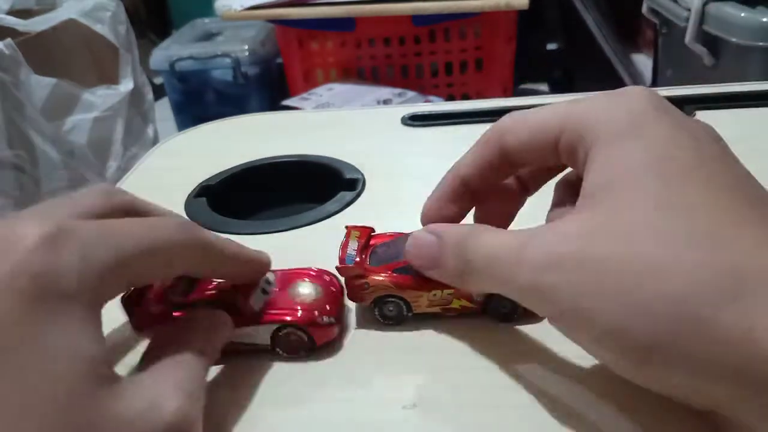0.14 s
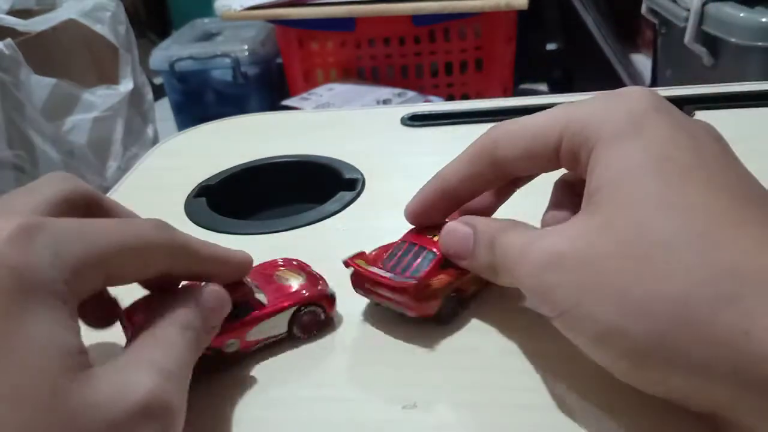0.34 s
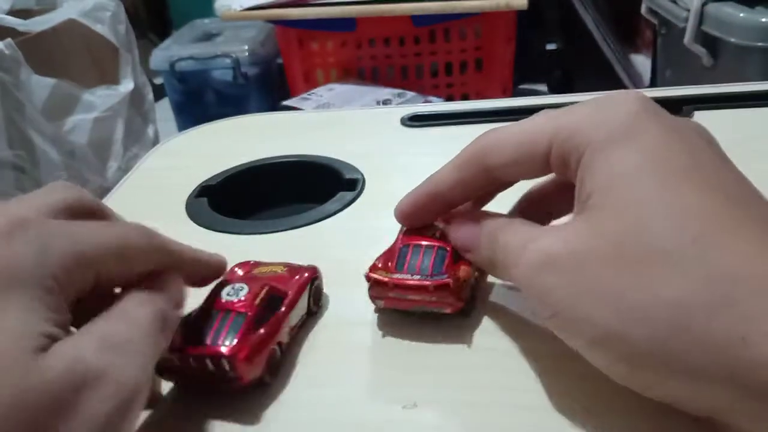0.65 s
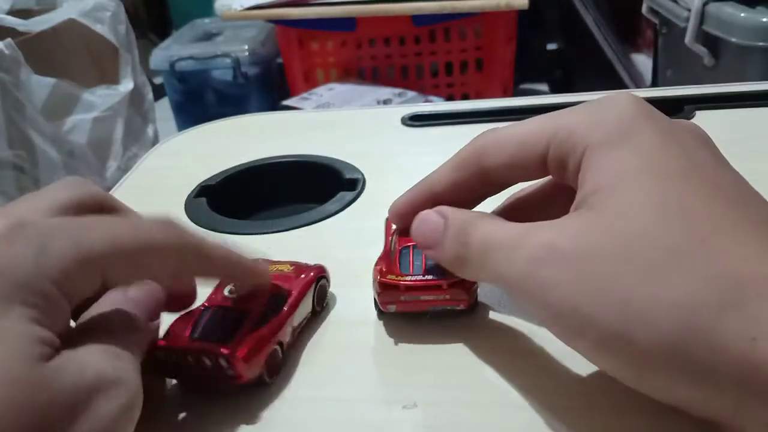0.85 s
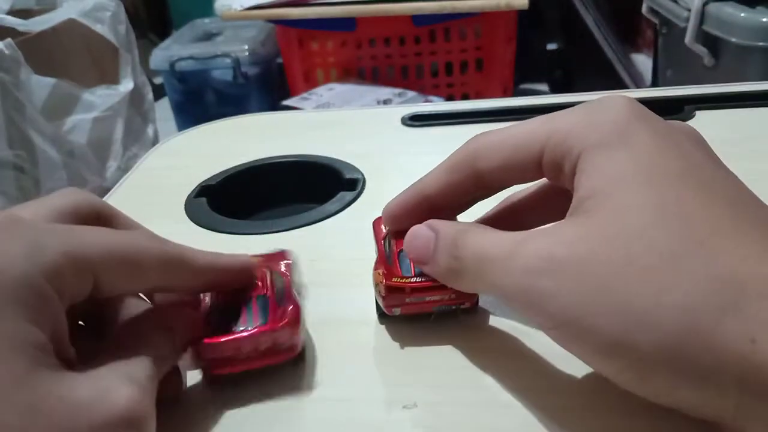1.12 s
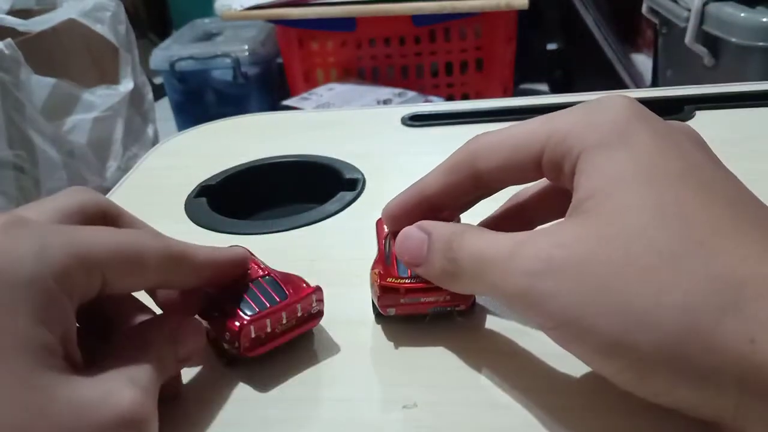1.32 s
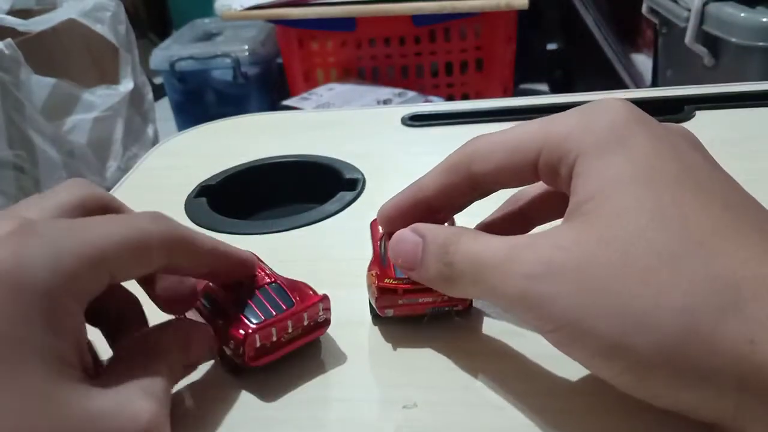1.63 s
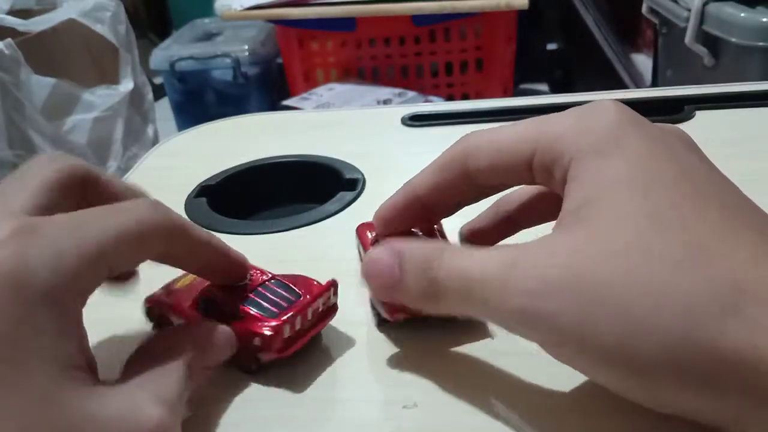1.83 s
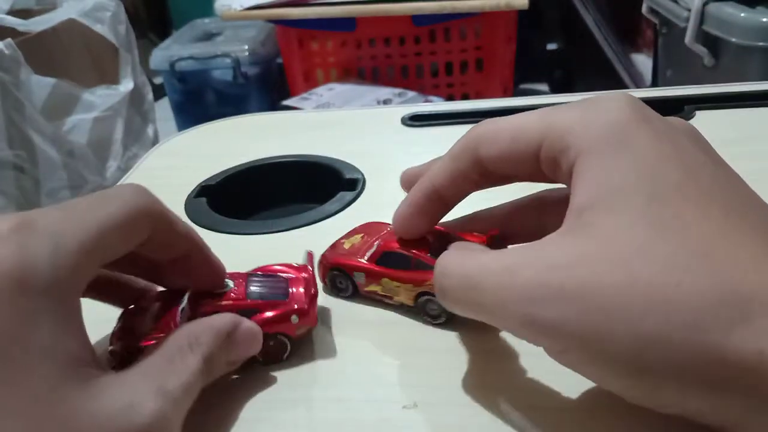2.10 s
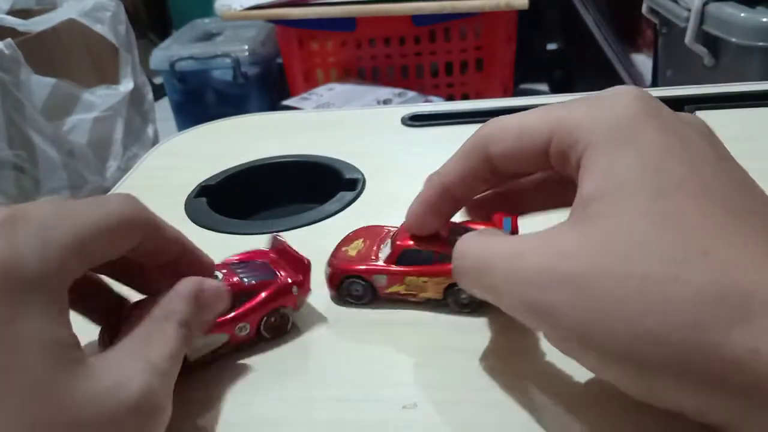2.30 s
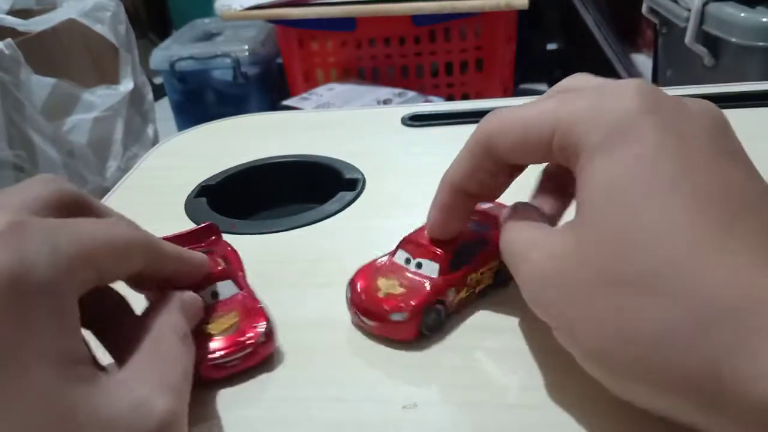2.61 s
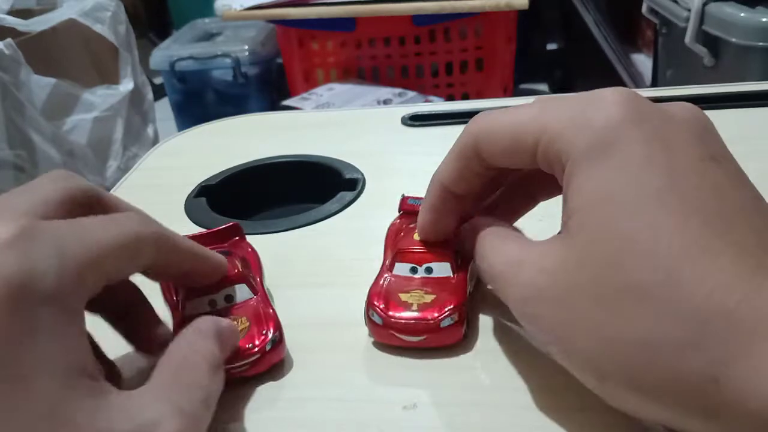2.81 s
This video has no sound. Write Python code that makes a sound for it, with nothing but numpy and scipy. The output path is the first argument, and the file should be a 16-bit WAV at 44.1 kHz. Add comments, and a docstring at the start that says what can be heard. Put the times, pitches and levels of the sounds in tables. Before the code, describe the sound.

Die-cast toy cars are handled on a desk, close up in a small room with faint hum. A bright metallic knock at 0.18 seconds starts gritty wheel chatter, strong until 0.7, then lighter, with a firm rattle near 1.27. Near quiet from 1.4 to 1.8. Rolling resumes, a tiny tyre squeak at 2.03, then dense clicks and rattles from 2.4, stopping around 2.85.

```python
"""A faint hum and soft room air come first, then a knock and wheel chatter: two die-cast toy cars on a desk.
They are steered about by hand in short pushes; loose axles click, metal bodies knock, a tyre squeaks once.
Grains of chatter and bursts of clicks drive five ringing parts: desk boom, upper desk, chassis, shell, axles.
Decaying sines make the pings and jingle, resonated noise the tyre scrub, short filtered ticks the grit.
A small room's diffuse tail, made of decaying noise, surrounds the cars."""
import sys
import numpy as np
from scipy import signal
from scipy.fft import rfft, irfft
from scipy.io import wavfile

SR = 44100
rng = np.random.default_rng(int(sys.argv[2]) if len(sys.argv) > 2 else 0)


def persist_wave(psi):
    """Save psi, clipped to +-1, as 16-bit WAV."""
    counts = np.round(np.clip(psi, -1, 1) * 32767).astype(np.int16)
    wavfile.write(sys.argv[1], SR, np.atleast_2d(counts).T)


N = 130095  # length in samples

# pushes of the cars, before each part's trim: start_s, desk_db, chassis_db, shell_db
PUSHES = [(0.156, -78, -66.5, -73), (0.176, -34.5, -35, -45), (0.2, -40, -52, -43), (0.23, -41.5, -37, -49),
          (0.3, -41, -36, -46.5), (0.35, -35, -35.5, -39), (0.42, -37, -32.5, -39), (0.47, -44.5, -40, -48),
          (0.521, -39, -39, -43.5), (0.595, -57, -50.5, -57.5), (0.609, -46.5, -51, -61.5),
          (0.627, -40.5, -35, -44), (0.67, -47, -37.5, -44.5), (0.721, -49.5, -52, -49.5),
          (0.76, -57.5, -56, -63.5), (0.84, -48, -47.5, -54), (0.93, -54, -51, -60),
          (0.981, -48, -52, -53.5), (1.05, -54, -75, -58), (1.08, -52, -50.5, -57.5),
          (1.14, -52, -47, -59.5), (1.189, -41.5, -40.5, -41), (1.219, -50, -50.5, -45),
          (1.269, -36.5, -29.5, -34.5), (1.31, -39, -44, -50), (1.34, -70, -75, -62), (1.4, -85, -82, -73),
          (1.59, -79, -74, -94), (1.618, -57.5, -57, -63), (1.7, -64, -69, -71.5), (1.78, -60.5, -65, -69),
          (1.83, -49.5, -51.5, -58.5), (1.899, -42, -43, -46.5), (1.98, -44, -41, -40.5),
          (2.06, -42, -36, -46.5), (2.115, -46.5, -52, -49), (2.19, -44.5, -52, -55.5),
          (2.256, -44.5, -45.5, -49), (2.3, -51, -53.5, -60.5), (2.35, -46.5, -47.5, -53),
          (2.43, -42, -36.5, -45.5), (2.47, -42.5, -42, -44.5), (2.512, -43.5, -34.5, -36),
          (2.57, -40, -36, -44), (2.64, -34.5, -32.5, -34), (2.7, -43, -40.5, -48),
          (2.809, -39, -36.5, -44.5), (2.87, -58, -96, -63)]
# knocks and axle clicks, before each part's trim: start_s, desk_db, chassis_db, shell_db, axle_db
CLICKS = [(0.1819, -31, -18.5, -23, -38), (0.1864, -48, -45, -41, -39), (0.1882, -44, -33, -25.5, -52),
          (0.195, -58, -26.5, -42, -52), (0.247, -62, -36.5, -40.5, -70), (0.275, -42, -39, -29.5, -61),
          (0.407, -52, -37, -46, -50), (0.493, -49, -31, -38.5, -64), (0.79, -52, -46.5, -56, -65),
          (0.962, -39, -36, -38, -54), (0.969, -47, -35.5, -45.5, -54.5), (0.983, -54, -36, -36.5, -60),
          (1.149, -49.5, -38.5, -41.5, -45.5), (1.201, -40, -34.5, -50, -66), (1.239, -66, -40, -38, -57),
          (1.286, -50, -36, -34, -51), (1.610, -56.5, -69, -57, -68), (1.665, -55, -51, -68, -67.5),
          (1.81, -45.5, -44, -50, -61), (1.862, -55, -49, -44.5, -62), (2.026, -77, -61, -42, -74),
          (2.061, -44, -34, -34.5, -72), (2.096, -41.5, -44, -37.5, -69), (2.1282, -47, -28, -29, -60),
          (2.1331, -36, -31, -41, -57), (2.233, -58, -48, -49, -79), (2.369, -42, -39.5, -39, -66),
          (2.394, -43, -53, -42.5, -58), (2.435, -50, -35.5, -41, -54.5), (2.447, -46, -39, -37.5, -61),
          (2.498, -36.5, -50, -33.5, -48), (2.543, -57, -44, -33, -49), (2.593, -46, -33.5, -38, -51.5),
          (2.604, -56, -50, -55, -46), (2.641, -49, -28, -51, -46.5), (2.665, -59, -29, -33, -54),
          (2.721, -41, -31.5, -33.5, -66), (2.75, -37.5, -32.5, -41.5, -54),
          (2.8, -45, -36.5, -35.5, -47.5)]
# trim of the clicks in desk boom, upper desk, chassis, shell and axles: trim_db
CLICK_TRIM_DB = [-2, -3.5, -1, 0.5, -0.5]
# upper edges of the desk boom, upper desk, chassis and shell ranges: edge_hz
PART_EDGES_HZ = [370, 1390, 3418, 7670]
# broad colour of a contact, relative: pitch_hz, level_db
CONTACT_COLOUR = [(60, -39), (125, -19), (200, -5.5), (290, -2.5), (460, -6), (560, -9), (720, -9.5),
                  (1200, -19), (1500, -15.5), (1950, -13.5), (2400, -3), (3300, -15), (4300, -7),
                  (5200, -10.5), (6200, -20.5), (8000, -31), (12500, -26), (13700, -22.5), (16000, -31)]
# resonances and notches of desk and cars, before detuning: pitch_hz, width_hz, lift_db
MODES = [(262, 22, 3), (368, 30, -7), (410, 22, 5), (455, 30, 5), (535, 35, -6), (720, 100, 4),
         (800, 30, -7), (1018, 50, 5), (1430, 110, 6), (2110, 60, 6), (2435, 140, 2), (2790, 140, 4),
         (4885, 80, 5)]
# ring of each part, levels against the direct sound: after_ring_db, ring_t60_s, room_db
PARTS = [(-4, 0.067, -12), (-0.5, 0.035, -7.5), (-4, 0.053, -4), (8.5, 0.024, -5.5), (12, 0.025, 4)]
# wheel chatter in each part: trim_db, grains_per_s, grain_spread_db, growth (extra dB per dB of push)
CHATTER = [(-4, 1600, 2.5, -0.13), (-4, 1400, 3.5, -0.01), (-1, 2000, 2.5, 0), (0, 1500, 5, 0),
           (-19.5, 410, 3, 0)]
# room decay: pitch_hz, t60_s
ROOM_T60 = [(150, 0.36), (1000, 0.17), (2800, 0.25), (14000, 0.23)]
# delay of the left channel at the first and last spot: first_lag_s, last_lag_s
LEFT_LAG_S = (.00009, .0002)
# left-right likeness of the ringing: pitch_hz, likeness (1 = identical)
RING_ALIKE = [(250, 0.89), (700, 0.48), (1500, .6), (2500, 0.019), (5000, 0.29)]
# stereo balance of the contacts: pitch_hz, left_minus_right_db
STEREO_TILT = [(100, -1), (200, -3), (1300, -2.5), (2400, 0), (4500, -3), (5500, 3), (9000, 1)]
# hum tones: pitch_hz, rms_level_db
HUM = [(58, -71), (119.7, -62)]
# colour of the room air, relative: pitch_hz, density_db (per Hz)
AIR_COLOUR = [(25, -24), (70, -6), (140, -6), (300, -16), (1000, -17), (1400, -23.5), (2400, -18.5),
              (3400, -28), (5000, -30.5), (7700, -40), (16000, -42.5)]
# left-right likeness of the air: pitch_hz, likeness (1 = identical)
AIR_ALIKE = [(50, 1), (300, 0.7), (900, 0.024)]
# a tyre scrubs sideways: start_s, length_s
SCRUB = (2.028, .05)
# loose wheels jingle: lowest_hz, highest_hz, touches_per_s, level_db (against the shell's push)
JINGLE = (4200, 5500, 130, -7)
# hard touches that set one mode of a car ringing: start_s, pitch_hz, peak_db
PINGS = [(0.1815, 4875, -25), (0.1815, 1540, -24), (0.4055, 5100, -33), (1.1065, 2430, -33)]
# colour of a wheel ticking over a speck, relative: pitch_hz, level_db
GRIT_COLOUR = [(200, -20), (700, 1), (5400, -1.5), (7500, -25), (15000, -21)]
# once the cars are turned round, a higher chassis sounds: start_s, colour_ratio
TURN = (2.1, 1.05)

AIR_DB = -60  # rms
SCRUB_HZ, SCRUB_WIDTH_HZ, SCRUB_DB = 1000, 120, -42.5
GRIT_PER_S, GRIT_SPREAD_DB, GRIT_DB = 450, 3, -4  # level against the shell's push
JINGLE_T60_S, JINGLE_SPREAD_DB = .02, 3.5
PING_T60_S, CHIME_RISE_S = .03, .002
ECHO_DB = -10.5  # room around tyres, pings and jingle
BOUNCE_PER_S, BOUNCE_DB, BOUNCE_FALL_DB_PER_S = 3200, -4, 2500  # rebounds against the first contact
USUAL_PUSH_DB = -44  # push at which the growth of the chatter is zero
DETUNE = .02  # largest share by which resonances shift from spot to spot
EARLY_COLOUR_RATIO = 0.97  # chassis before the turn
BAND_LIMIT_HZ = 15750


def amp(db):
    """Decibels to gain."""
    return 10 ** (np.asarray(db) / 20)


def unit(x):
    """Scales to rms 1."""
    return x / np.sqrt(np.mean(x ** 2) + 1e-20)


def read(points, hz):
    """Reads a curve on a log-frequency axis."""
    f, value = np.transpose(points)
    return np.interp(np.log(hz + 1), np.log(f + 1), value)


def add(mix, s, sound):
    """Mixes a sound in at time s."""
    part = mix[max(round(s * SR), 0):][:len(sound)]
    part += sound[:len(part)]


def pair(x, likeness):
    """Makes two unrelated channels alike to a degree that depends on frequency."""
    a, b = rfft(x)
    alike = np.clip(read(likeness, np.fft.rfftfreq(x.shape[1], 1 / SR)), -1, 1)
    mixed = alike * a + np.sqrt(1 - alike ** 2) * b
    return irfft(np.array([a, mixed]), x.shape[1])


def causal(gain, size=4096):
    """Minimum-phase response of this magnitude: energy as early as possible, scaled to 1."""
    log = np.log(np.maximum(gain / gain.max(), 1e-5))
    mirrored = np.r_[log, log[-2:0:-1]]
    spectrum = np.exp(np.conj(signal.hilbert(mirrored)))
    h = np.fft.ifft(spectrum).real[:size]
    return h / np.linalg.norm(h)


def push(column):
    """Level of one column of the pushes over time in dB, dying away after the last."""
    t, rows = np.arange(N) / SR, np.array(PUSHES)
    level_db = np.interp(t, rows[:, 0], rows[:, column])
    return level_db - 300 * np.maximum(t - rows[-1, 0], 0)


def lag_left(x):
    """Delays the left channel, so the sound reaches the right one first."""
    return np.array([np.roll(x, round(np.mean(LEFT_LAG_S) * SR)), x])


def background():
    """Mains hum as steady sines, and the soft air of the room as coloured noise."""
    hz, t = np.fft.rfftfreq(N, 1 / SR), np.arange(N) / SR
    noise = pair(rng.standard_normal((2, N)), AIR_ALIKE)
    air = irfft(rfft(noise) * amp(read(AIR_COLOUR, hz)), N)
    hum = sum(amp(db) * np.sqrt(2) * np.sin(2 * np.pi * (f * t + rng.random())) for f, db in HUM)
    return amp(AIR_DB) * unit(air) + hum


def room_tail(size=22050):
    """Diffuse tail for each channel: noise that decays at a rate set by its frequency, bass lasting longest."""
    hz, t, z = signal.stft(rng.standard_normal((2, size)), SR, nperseg=256)
    decay = amp(-60 * t / read(ROOM_T60, hz)[:, None])
    tail = signal.istft(z * decay, SR, nperseg=256)[1][:, :size]
    tail = tail * np.minimum(np.arange(size) / SR / 0.0079, 1)  # 7.9 ms build-up
    return tail / np.linalg.norm(tail, axis=1, keepdims=True)


def scrub():
    """A short, rough squeak as a car is turned on its tyres: noise through one narrow resonance."""
    start, length = SCRUB
    t, out = np.arange(0, length, 1 / SR), np.zeros(N)
    r = np.exp(-np.pi * SCRUB_WIDTH_HZ / SR)  # pole radius
    poles = [1, -2 * r * np.cos(2 * np.pi * SCRUB_HZ / SR), r * r]
    slip = signal.lfilter([1, 0, -1], poles, rng.standard_normal(N))[-len(t):]
    swell = np.sqrt(np.sin(np.pi * t / length))
    add(out, start, amp(SCRUB_DB) * unit(slip * swell))
    return out


def grit(size=2048):
    """Sharp, dry ticks of hard wheels on specks, too short to ring."""
    sizes = amp(GRIT_SPREAD_DB * np.minimum(rng.exponential(1, N), 3))
    ticks = (rng.random(N) < GRIT_PER_S / SR) * sizes
    tick = causal(amp(read(GRIT_COLOUR, np.fft.rfftfreq(size, 1 / SR))))
    return signal.oaconvolve(unit(ticks) * amp(GRIT_DB + push(-1)), tick)[:N]


def chime(t, hz, t60):
    """One mode that swells for a moment and dies."""
    rise = np.minimum(t / CHIME_RISE_S, 1)
    decay = amp(-60 * np.maximum(t - CHIME_RISE_S, 0) / t60)
    return rise * decay * np.sin(2 * np.pi * hz * t)


def jingle(size=1200):
    """Wheels rattle on their axles, each touch at a pitch of its own, its level following the push."""
    low_hz, high_hz, per_s, db = JINGLE
    t, out, push_db = np.arange(size) / SR, np.zeros(N), push(-1)
    for when, pitch, strength in rng.random((round(per_s * N / SR), 3)):
        size_db = JINGLE_SPREAD_DB * min(-np.log(1 - strength), 2)
        level_db = db + size_db + push_db[int(when * N)]
        touch = chime(t, low_hz + pitch * (high_hz - low_hz), JINGLE_T60_S)
        add(out, when * N / SR, amp(level_db) * touch)
    return out


def ping():
    """Single modes of the metal bodies and wheels ring on after a touch."""
    t = np.arange(N) / SR
    return sum(amp(db) * chime(np.maximum(t - s, 0), hz, PING_T60_S) for s, hz, db in PINGS)


def wheels():
    """Dense tiny impacts of the wheels; hard pushes wake the desk's upper modes more than its boom."""
    chance, sign = rng.random(N), rng.choice([-1., 1.], N)
    grain = np.minimum(rng.exponential(1, N), 4)
    forces = []
    # both desk parts share the desk push; shell and axles share the shell push
    for column, (db, per_s, spread_db, growth) in zip([1, 1, 2, 3, 3], CHATTER):
        push_db = push(column)
        grains = (chance < per_s / SR) * sign * amp(spread_db * grain)
        level_db = db + push_db + growth * (push_db - USUAL_PUSH_DB)
        forces.append(unit(grains) * amp(level_db))
    return np.array(forces)


def clicks(size=900):
    """Each knock is one sharp contact and a quick run of fading rebounds; one force per part."""
    forces, t = np.zeros((len(PARTS), N)), np.arange(size) / SR
    for s, desk_db, *car_db in CLICKS:
        hits = (rng.random(size) < BOUNCE_PER_S / SR) * rng.standard_normal(size)
        burst = hits * amp(BOUNCE_DB - BOUNCE_FALL_DB_PER_S * t)
        burst[0] = 1
        burst = burst / np.linalg.norm(burst) * np.sqrt(.01 * SR)  # energy of rms 1 over 10 ms
        for force, db, trim_db in zip(forces, [desk_db, desk_db, *car_db], CLICK_TRIM_DB):
            add(force, s, burst * amp(db + trim_db))
    return forces


def response(part, lag_s, colour_ratio, size=16384):
    """One spot of a part in stereo: direct sound, dense after-ring and room, coloured by its modes."""
    ring_db, t60, room_db = PARTS[part]
    hz, t = np.fft.rfftfreq(size, 1 / SR), np.arange(size) / SR
    shift = 1 + DETUNE * rng.uniform(-1, 1)
    modes_db = sum(db / (1 + ((hz - f * shift) / (w / 2)) ** 2) for f, w, db in MODES)
    colour_db = read(CONTACT_COLOUR, hz / colour_ratio) + modes_db
    # neighbouring low-passes, subtracted, leave the part's own range
    below = [0] + [1 / (1 + (hz / edge) ** 14) for edge in PART_EDGES_HZ] + [1]
    gain = amp(colour_db) * np.sqrt(abs(below[part + 1] - below[part]))
    ring = rng.standard_normal((2, size)) * amp(-60 * t / t60)
    after_ring = amp(ring_db) * ring / np.linalg.norm(ring[0])
    diffuse = pair(after_ring + amp(room_db) * room_tail(size=size), RING_ALIKE)
    side = amp(read(STEREO_TILT, hz) / 2)
    ears = np.array([side * np.exp(-2j * np.pi * hz * lag_s), 1 / side])
    direct = t == 0
    h = irfft(rfft(direct + diffuse) * rfft(causal(gain), size) * ears, size)
    h = h[:, :size * 3 // 4]
    return h / np.sqrt(np.sum(h ** 2) / 2)


def cars(count=4):
    """The contacts wander between spots on cars and desk, each ringing a little differently."""
    forces, out = wheels() + clicks(), np.zeros((2, N))
    spot = np.repeat(rng.integers(0, count, N // 256 + 1), 256)[:N]  # a new draw every 256 samples
    turned = np.arange(N) / SR > TURN[0]
    layers = [(part, force, 1) for part, force in enumerate(forces) if part != 2]
    # the chassis (part 2) changes colour at the turn
    layers += [(2, forces[2] * ~turned, EARLY_COLOUR_RATIO), (2, forces[2] * turned, TURN[1])]
    for part, force, colour_ratio in layers:
        for k, lag_s in enumerate(np.linspace(*LEFT_LAG_S, count)):
            here = (force * (spot == k))[None]
            out += signal.oaconvolve(here, response(part, lag_s, colour_ratio), axes=1)[:, :N]
    return out


def scene():
    """Cars on the desk over the quiet room; scrub and ticks reach the right first, rings sit in the middle."""
    quiet = background()
    tyres, rings = scrub() + grit(), ping() + jingle()
    echo = amp(ECHO_DB) * signal.oaconvolve((tyres + rings)[None], room_tail(), axes=1)[:, :N]
    return quiet + echo + lag_left(tyres) + rings + cars()


def record(dry):
    """The recorder's band limit: a steep low-pass."""
    lowpass = signal.firwin(511, BAND_LIMIT_HZ, window=("kaiser", 9), fs=SR)
    return signal.oaconvolve(dry, lowpass[None], "same")


dry = scene()
out = record(dry)
persist_wave(out)
```